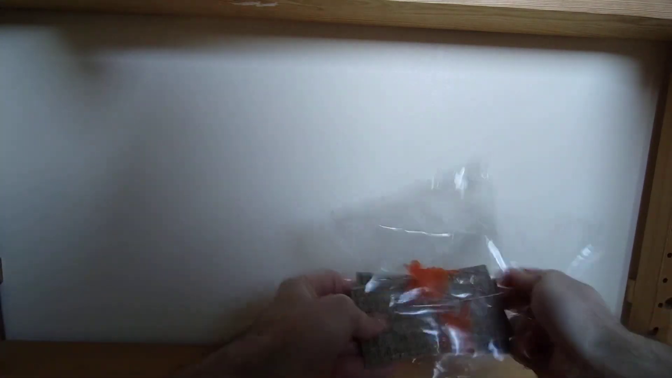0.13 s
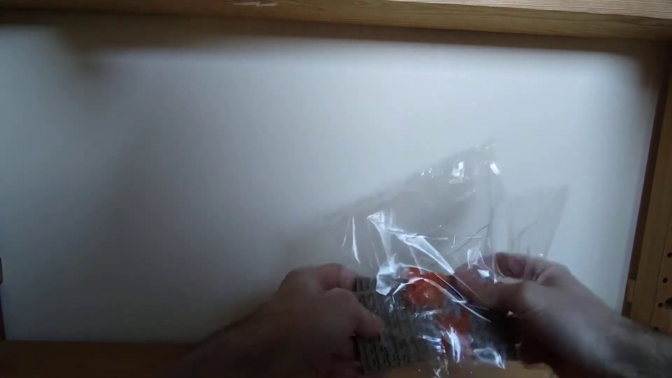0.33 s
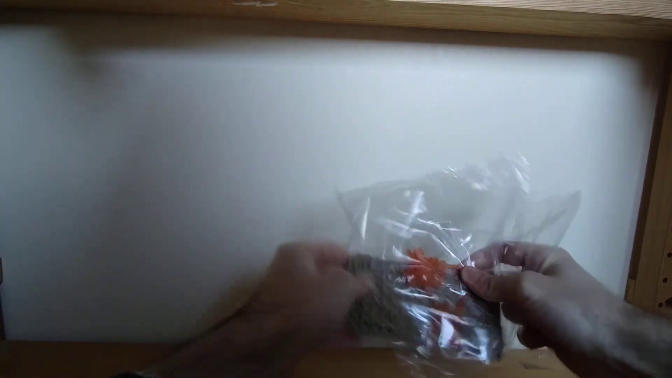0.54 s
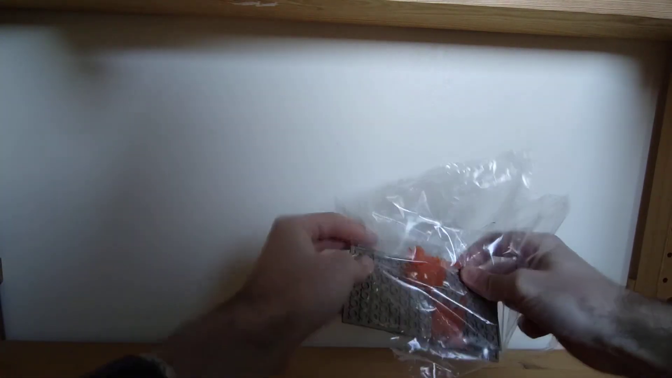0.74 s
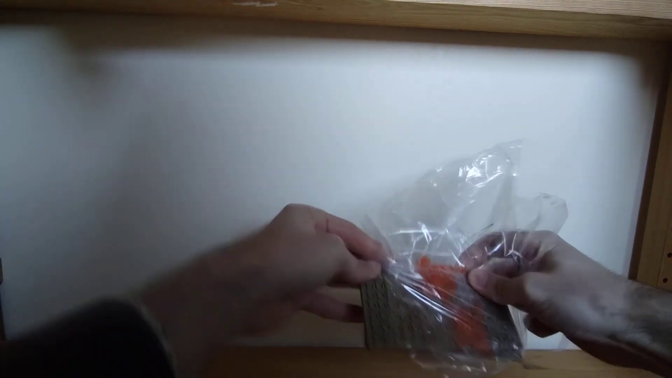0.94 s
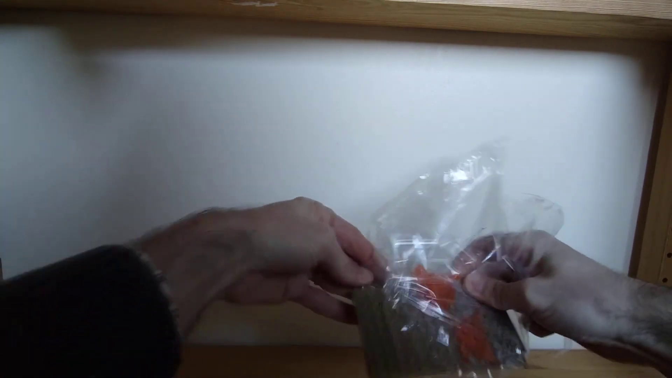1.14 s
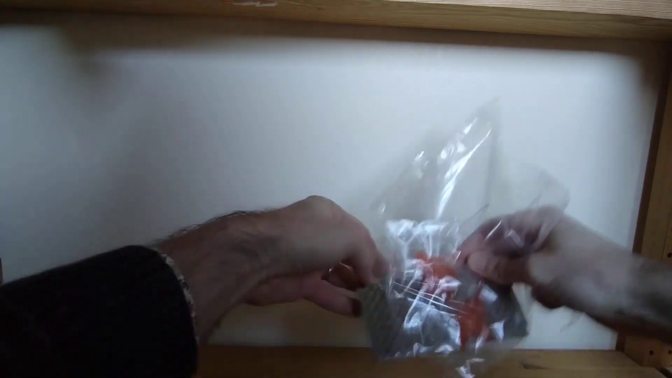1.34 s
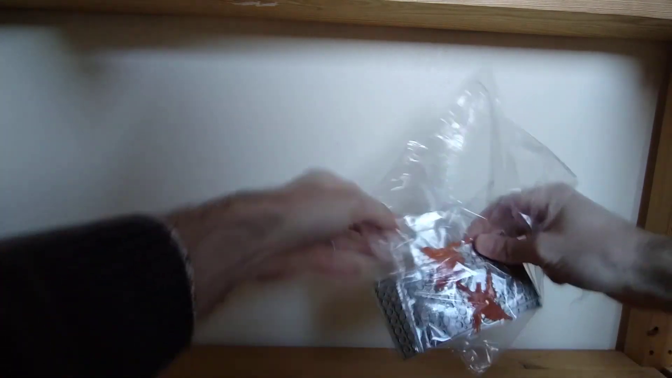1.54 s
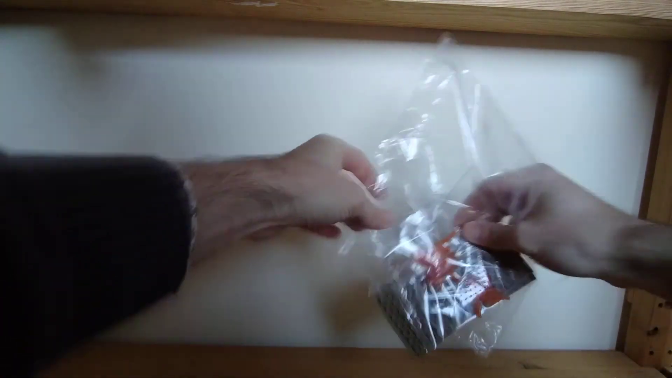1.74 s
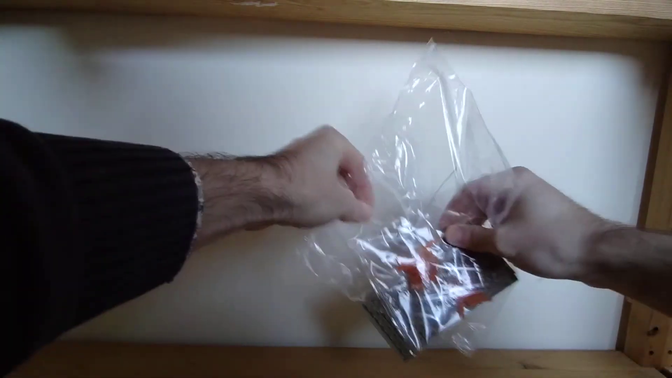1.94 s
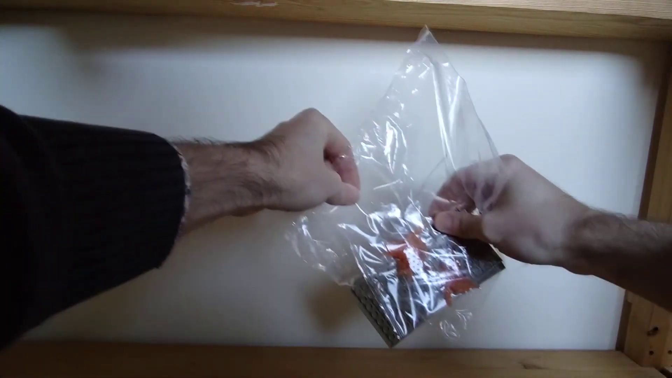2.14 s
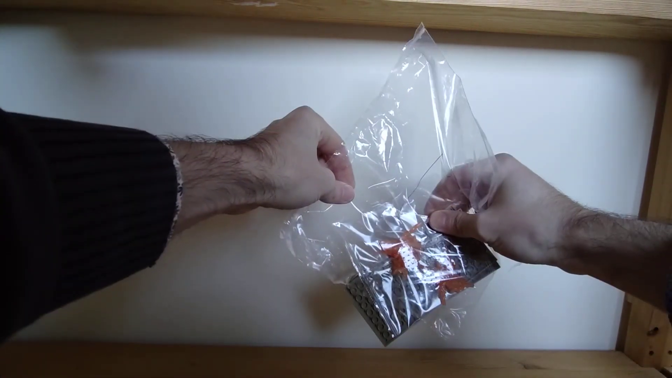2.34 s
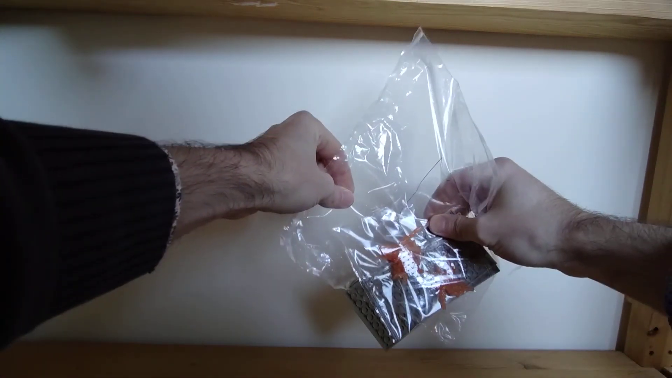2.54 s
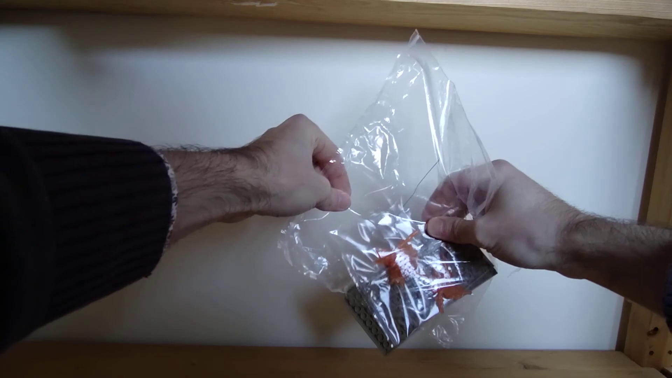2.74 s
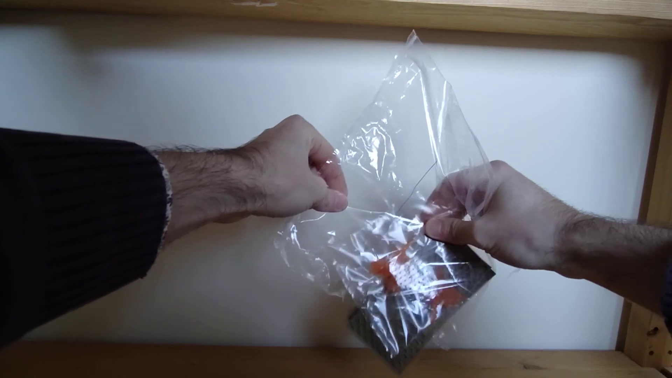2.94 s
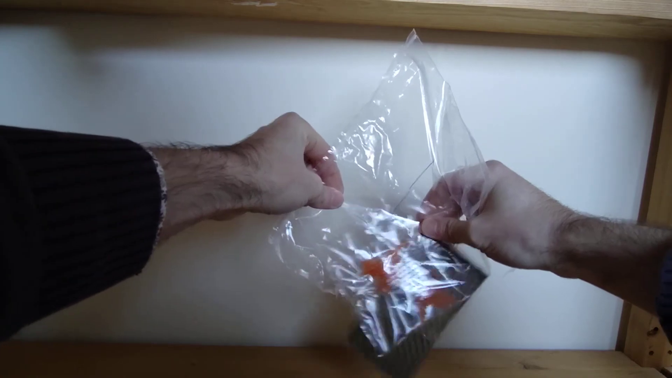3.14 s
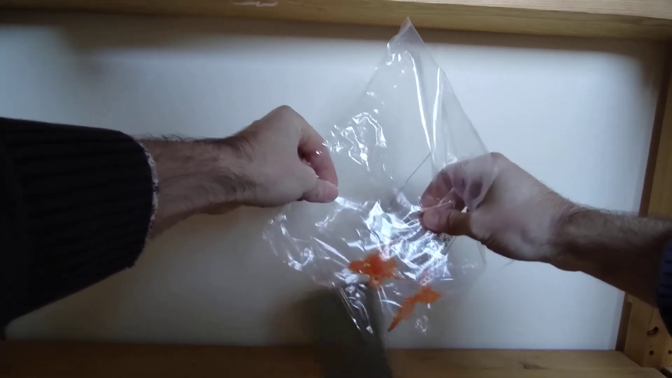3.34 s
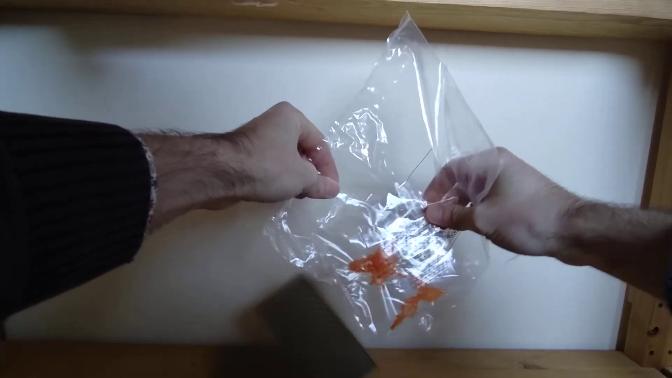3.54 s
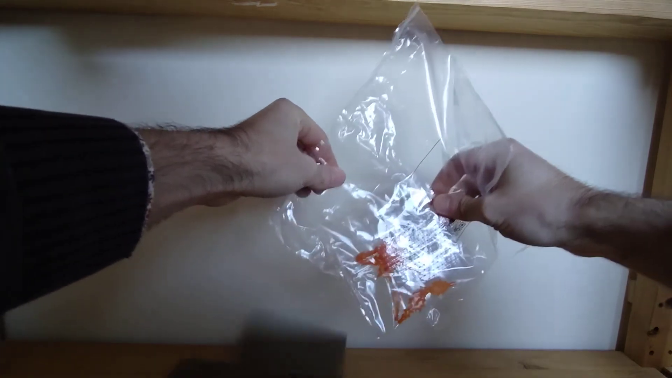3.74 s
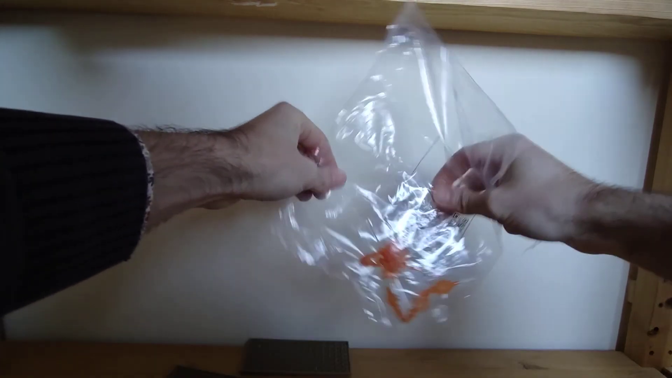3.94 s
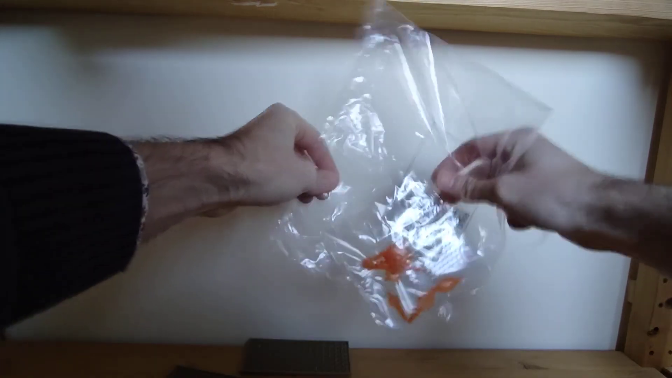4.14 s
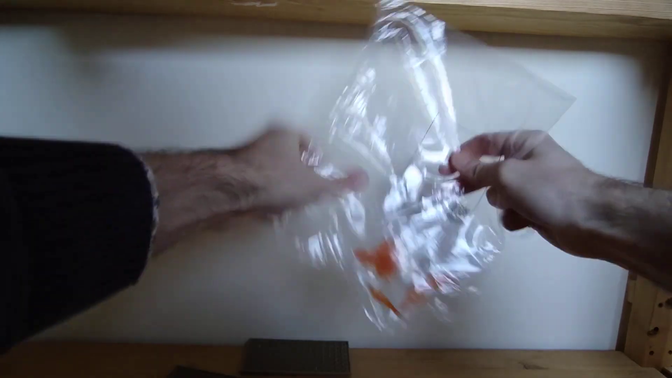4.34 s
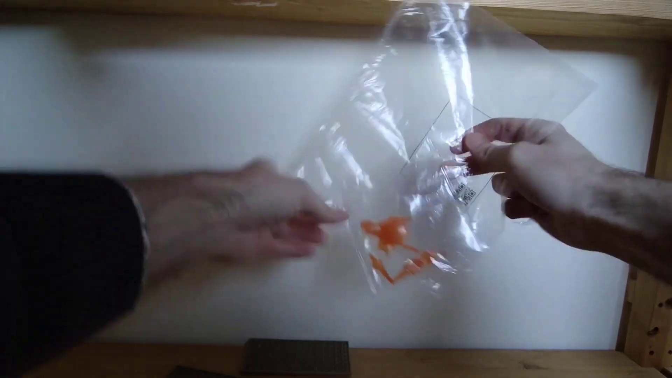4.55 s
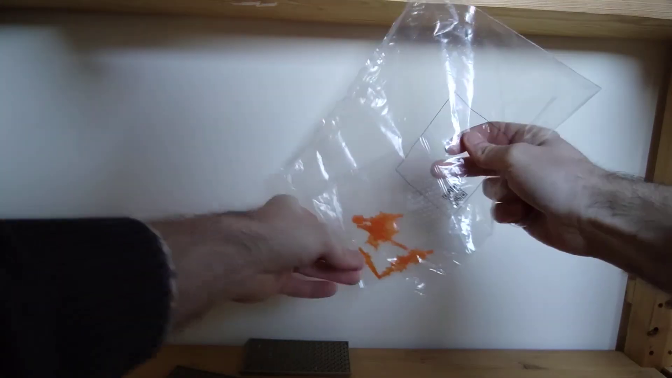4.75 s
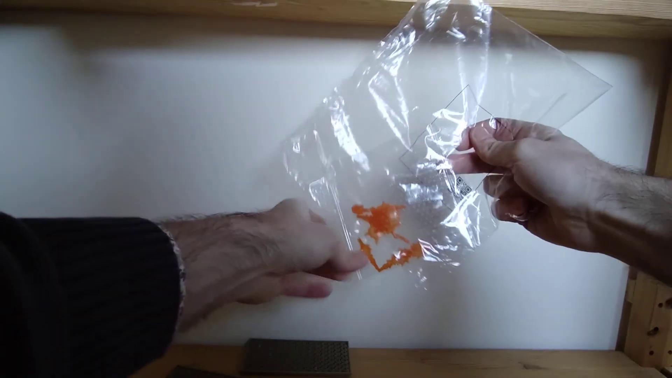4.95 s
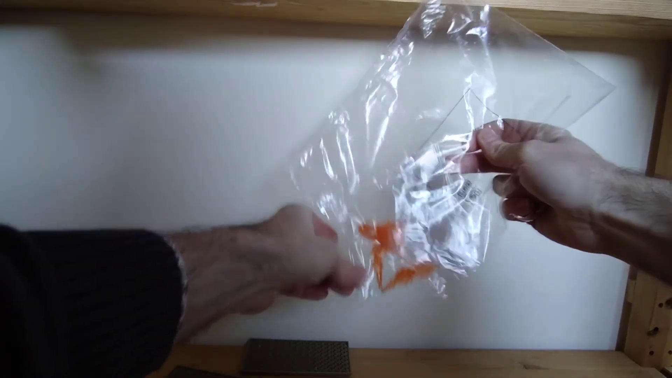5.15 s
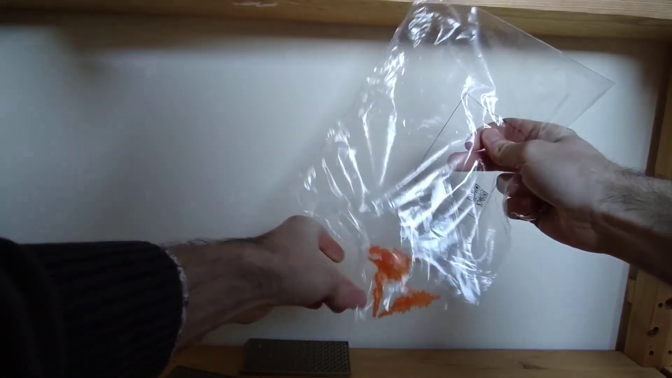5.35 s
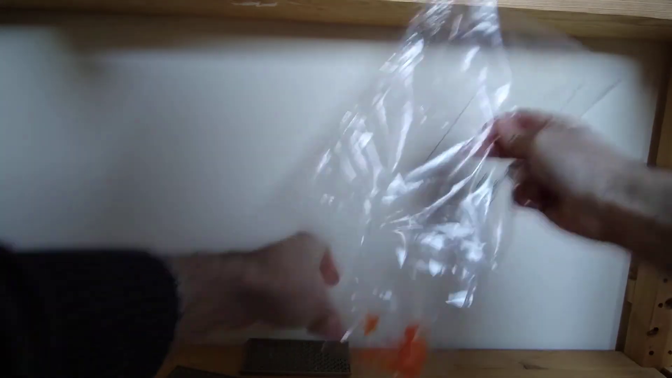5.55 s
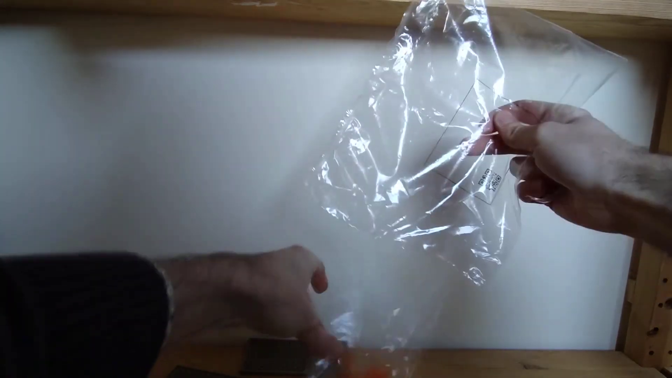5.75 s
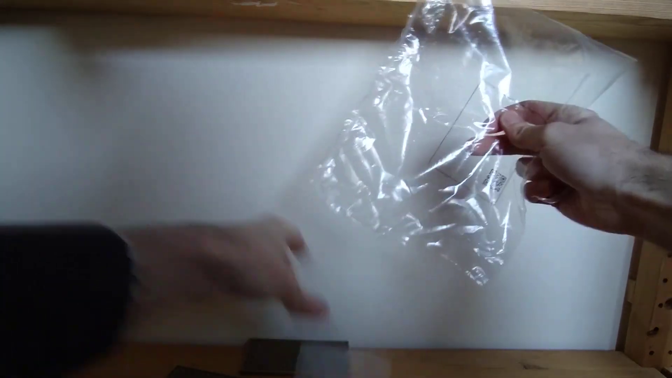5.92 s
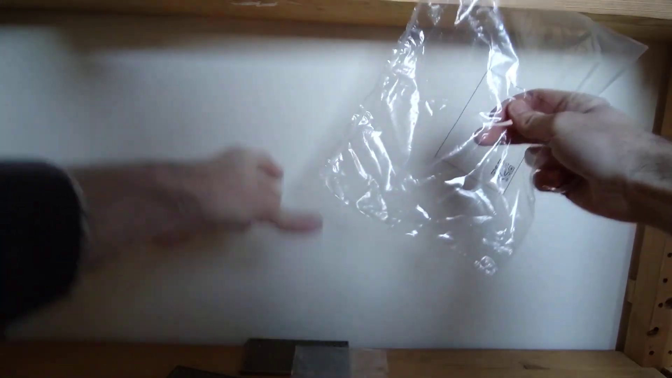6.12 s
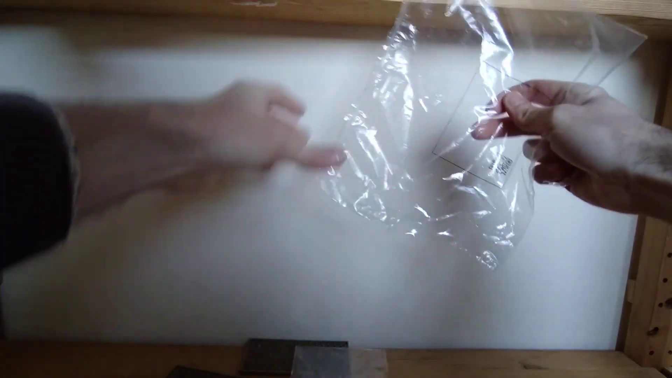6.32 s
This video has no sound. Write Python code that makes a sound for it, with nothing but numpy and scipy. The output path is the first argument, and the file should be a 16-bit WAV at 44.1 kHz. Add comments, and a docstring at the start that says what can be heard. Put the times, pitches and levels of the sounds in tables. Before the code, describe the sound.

Close stereo microphones inside a wooden shelf in a small room. Thin, stiff plastic film crackles and snaps as hands pull it, most densely early on, then nearly stills. A cardboard pad drops out and knocks and tumbles hollowly on the board, with one very sharp film snap. Irregular rustling resumes, and small bags land faintly near the end over low hiss.

```python
"""Inside a wooden shelf in a small room, a pair of microphones close to the hands.
The hands pull open a thin, stiff plastic bag: the film buckles in snaps, made of shaped noise bursts,
over a finer crackle of many tiny noise grains. A cardboard pad drops out and tumbles on the shelf board,
later the small bags follow: soft pushes and rattling noise drive the decaying modes of the board.
Sparse random echoes give the room; hiss lies beneath."""
import sys
import numpy as np
from scipy import signal
from scipy.fft import rfft, irfft
from scipy.io import wavfile
from scipy.ndimage import uniform_filter1d

SR = 44100
rng = np.random.default_rng(int(sys.argv[2]) if len(sys.argv) > 2 else 0)


def int16_out(signal):
    """Quantize to a 16-bit WAV file."""
    q = np.round(np.clip(np.atleast_2d(signal).T, -1, 1) * 32767)
    wavfile.write(sys.argv[1], SR, q.astype(np.int16))


N = 285768  # samples


def gain_of(db):
    """Amplitude factor of a level in dB."""
    return 10 ** (np.asarray(db) / 20)


def power_of(db):
    """Power factor of a level in dB."""
    return 10 ** (np.asarray(db) / 10)


def evened(x):
    """Bring a sound to an RMS of 1 over all its channels."""
    return x / np.sqrt(np.mean(x ** 2) + 1e-20)


def frequencies(size):
    """Frequencies in Hz of the spectrum of that many samples."""
    return np.fft.rfftfreq(size, 1 / SR)


def read_curve(points, hz):
    """Read a curve over frequency, straight on a logarithmic frequency axis."""
    f, value = np.transpose(points)
    return np.interp(np.log(hz + 1), np.log(f + 1), value)


def add(mix, s, sound):
    """Lay a stereo sound into the mix at s seconds, cut off at the end."""
    part = mix[:, round(s * SR):][:, :sound.shape[1]]
    part += sound[:, :part.shape[1]]


# likeness of the two microphones: (f/Hz, share in common 0-1)
LIKENESS = [(60, 1), (200, 0.97), (350, 1), (560, 0.42), (1400, 0.52), (3000, 0.037), (16000, 0.0081)]


def pair(a, b, gain=1):
    """Two spaced microphones: alike in the bass, nearly unrelated in the treble."""
    same = np.clip(read_curve(LIKENESS, frequencies(len(a))), 0, 1)
    left = rfft(a)
    right = same * left + np.sqrt(1 - same ** 2) * rfft(b)
    return irfft(gain * np.array([left, right]), len(a))


def burst(noise, colour, rise_s, length_s, lag_s=0, direct=0):
    """Coloured noise under a quick rise and a dying tail; a direct share reaches both microphones, lagged."""
    size = noise.shape[1]
    t = np.arange(size) / SR
    tail = np.exp(-(t / length_s) ** 1.8) + .15 * np.exp(-t / (3 * length_s))
    shape = (1 - np.exp(-t / rise_s)) * tail
    left, right = evened(pair(*noise, colour))
    lagged = irfft(rfft(left) * np.exp(-2j * np.pi * frequencies(size) * lag_s), size)
    right = direct * lagged + np.sqrt(1 - direct ** 2) * right
    return np.array([left, right]) * shape / shape.max() / 2


def swell(s, rise_s, hold_s, db, dying_db):
    """Power of a move: a steep rise, a hold, then a steady fall in dB per second."""
    t = np.arange(N) / SR - s
    falling_db = db - dying_db * np.maximum(t - rise_s - hold_s, 0)
    return power_of(falling_db) * np.clip(t / rise_s, 0, 1) ** 4


# colour of the background, relative: (f/Hz, level/dB per Hz)
HISS_COLOUR = [(15, -23), (25, -8), (109, 5), (587, -14), (2290, -19), (2770, -48), (3090, -77),
               (6090, -47), (10200, -33), (15000, -26), (16700, -53)]
HISS_RMS_DB = -58  # ahead of the microphone response


def hiss():
    """Microphone noise, apart in each channel, and the quiet of the house shared by both."""
    colour = gain_of(read_curve(HISS_COLOUR, frequencies(N)))
    own, shared = rng.standard_normal((2, N)), rng.standard_normal(N)
    return gain_of(HISS_RMS_DB) * evened(irfft(rfft(own + 0.69 * shared) * colour, N))


# how long the room rings: (f/Hz, t60/s)
ROOM_DECAY = [(100, 0.23), (400, 0.32), (1700, 0.25), (4600, 0.25), (12000, 0.22)]


def room(x):
    """Sparse taps of random sign, each band dying at its own speed; the small space holds little bass."""
    signs = rng.choice([-1., 1.], (2, SR))
    taps = signs * (rng.random((2, SR)) < .06)
    hz, t, z = signal.stft(pair(*taps), SR, nperseg=256)
    t60 = np.maximum(read_curve(ROOM_DECAY, hz), .05)[:, None]
    tail = signal.istft(z * gain_of(-60 * t / t60), SR, nperseg=256)[1]
    tail = signal.sosfilt(signal.butter(2, 300, "high", fs=SR, output="sos"), tail)
    tail = np.pad(tail, ((0, 0), (round(0.0035 * SR), 0)))  # the walls answer a little late
    return signal.fftconvolve(x, tail / np.linalg.norm(tail[0]), axes=1)[:, :N]


# modes of the shelf board and its hollow: (f/Hz, relative level/dB, t60/s)
BOARD_MODES = [(58.5, -16, 0.93), (117.6, -3, 0.13), (148.9, -2, 0.37), (192.4, -4.5, 0.21),
               (224, -6, 0.11), (262, -5, 0.087), (341, -2.5, 0.099), (456, -9, 0.041), (569, -5, 0.16),
               (708, -4.5, 0.047), (756, -7, 0.42), (913, 9.5, 0.025), (1225, 7.5, 0.029),
               (1282, 1.5, 0.071)]


def board_modes():
    """Decaying sines of the board as each microphone hears them: (microphone, mode, time)."""
    t = np.arange(SR // 2) / SR
    hz, db, t60 = np.transpose(BOARD_MODES)[:, :, None]
    facing = (-1) ** np.arange(len(BOARD_MODES))[:, None]  # neighbouring modes alternate in sign, so their sum adds no deep lump
    # the less alike the microphones at a pitch, the further out of step its mode reaches them
    lag = np.arccos(np.clip(read_curve(LIKENESS, hz), 0, 1)) * facing
    decay = facing * gain_of(db - 60 * t / t60)
    first_cycle = np.minimum(hz * t, 1)  # the phase difference opens over one cycle
    return np.array([decay * np.sin(2 * np.pi * hz * t + turn * first_cycle)
                     for turn in (lag / 2, -lag / 2)])


# pad and small bags landing on the board:
# (t/s, relative ring level/dB, hardness as low-pass f/Hz, relative slap level/dB)
BLOWS = [(3.4639, -11.5, 565, -14), (3.54, -16, 900, -35), (3.584, -16.5, 900, -21), (3.74, -17, 850, -2.5),
         (3.859, -21, 1550, -4), (3.898, -22, 1530, -5), (4.055, -28.5, 1140, -10), (4.09, -56, 520, -22),
         (4.26, -41.5, 199, -63), (5.656, -55, 900, -15.5), (5.927, -42, 730, -19.5),
         (6.117, -27, 194, -63), (6.151, -34, 204, -58), (6.22, -30.5, 199, -46), (6.302, -42.5, 202, -62)]


def blows(modes):
    """Each landing pushes the board modes, longer if softer, and slaps the air out."""
    out, hz = np.zeros((2, N)), frequencies(4096) + 1
    t = np.arange(2000)[None] / SR
    noise = rng.standard_normal((len(BLOWS), 2, 4096))
    for (s, ring_db, hard_hz, slap_db), z in zip(BLOWS, noise):
        u = 2 * np.pi * hard_hz * t
        push = u * np.exp(-u) * 2 * np.pi * hard_hz / SR
        spot = gain_of(1.5 * z[0, :len(BOARD_MODES)])  # each spot of the board favours other modes
        spot[0] *= min(hard_hz / 450, 1) ** 2  # a soft landing also damps the deepest mode
        add(out, s, -gain_of(ring_db) * signal.oaconvolve(spot @ modes, push, axes=1))
        slap_colour = 1 / (1 + (hz / (3 * hard_hz)) ** 2.7) / (1 + (400 / hz) ** 2)
        add(out, s, gain_of(slap_db) * burst(z, slap_colour, rise_s=0.0042, length_s=0.0031))
    return out


# pad and small bags rocking and scraping on the board:
# (start t/s, hold t/s, level/dB, fall/dB per s)
ROCKING = [(3.465, 0.061, -23.5, 132), (3.76, 0.024, -22.5, 150), (3.856, 0.13, -29, 92.5),
           (4.032, 0.075, -30, 153), (5.638, 0.013, -36, 200), (6.128, 0.055, -50, 121)]
ROCK_RISE_S = 0.016
GRIT_DB, GRIT_LOW_HZ, GRIT_HIGH_HZ = -8.5, 900, 2600  # grit of the scraping, against the ringing


def rocking(modes):
    """Dull noise of the contact drives the board modes; a band of the same noise is the grit."""
    contact = signal.lfilter([1], [1, -.93], pair(*rng.standard_normal((2, N))))
    band = signal.butter(1, [GRIT_LOW_HZ, GRIT_HIGH_HZ], "band", fs=SR, output="sos")
    grit = evened(signal.sosfilt(band, contact))
    ringing = evened(signal.oaconvolve(contact, modes.sum(1), axes=1)[:, :N])
    power = sum(swell(s, ROCK_RISE_S, *shape) for s, *shape in ROCKING)
    return np.sqrt(power) * (ringing + gain_of(GRIT_DB) * grit)


def board():
    """Blows and rocking share the modes of the one shelf board."""
    modes = board_modes()
    return blows(modes) + rocking(modes)


# moves of the hands, each a shower of crackle:
# (start t/s, hold t/s, crackle level/dB, fall/dB per s, treble relative to the crackle/dB)
MOVES = [(0, 0.078, -42, 75, -8.5), (0.309, .06, -31, 52.5, -6.5), (0.521, 0.53, -35.5, 66, -7.5),
         (1.3, 0.074, -34, 45, -15), (1.843, 0.019, -33, 89, -12), (2.955, 0.067, -52.5, 54, -16),
         (3.317, 0.081, -35.5, 68, -11.5), (3.507, 0.038, -40.5, 51, -11.5), (3.858, 0.046, -26, 73.5, -15),
         (3.944, 0.085, -22.5, 164, -27), (4.392, 0.03, -40.5, 133, -13), (4.56, .12, -49, 90, -11),
         (4.984, 0.023, -41, 140, -10.5), (5.205, 0.056, -41.5, 61, -16), (5.311, 0.014, -36.5, 47, -12),
         (5.645, 0.037, -20, 281, -8.5), (5.754, 0.06, -41.5, 106, -15), (5.92, .05, -49.5, 89, 0.5),
         (6.073, .04, -45.5, 110, -12)]
MOVE_RISE_S = 0.021
REST_DB, REST_BRIGHT_DB = -66.5, -10  # the bag at rest still ticks faintly


def hand_powers():
    """Power of the hands' moves over time: of the crackle below the treble, and of its treble."""
    powers = [swell(s, MOVE_RISE_S, *shape) for s, *shape, _ in MOVES]
    power = sum(powers) + power_of(REST_DB)
    treble = sum(p * power_of(move[-1]) for p, move in zip(powers, MOVES))
    return power, treble + power_of(REST_DB + REST_BRIGHT_DB)


# colour of the crackling film, relative: (f/Hz, level/dB per Hz)
FILM_COLOUR = [(35, -45), (60, -10.5), (140, -3), (173, -6), (662, -5.5), (900, -2.5), (1060, -7.5),
               (1960, 2), (6350, -5.5), (12300, -39), (15200, -28), (16700, -50)]


def crackle(per_s=600, spread_db=3.5, count=24):
    """A shower of tiny creases of many sizes; a hard slide packs them into a hiss."""
    power, treble = hand_powers()
    level_db = 10 * np.log10(power)
    rate = per_s * (1 + 12 / (1 + np.exp(-(level_db + 29) / 1.5)))  # grains per second
    size = gain_of(spread_db * np.minimum(rng.exponential(1, N), 5))
    size = size * (rng.random(N) < rate / SR) / np.sqrt(rate)
    kind, out = rng.integers(0, count, N), np.zeros((2, N))
    grain_hz = frequencies(512) + 1
    for k, ring_hz in enumerate(np.geomspace(400, 14000, count)):
        hump = .35 + np.exp(-(np.log2(grain_hz / ring_hz) / .6) ** 2)
        grain = burst(rng.standard_normal((2, 512)), hump, rise_s=0.0004, length_s=0.0025)
        out += signal.oaconvolve((size * (kind == k))[None], grain, axes=1)[:, :N]
    # flatten the shower's spectrum, then give it the colour of the film
    spectrum, hz = rfft(out), frequencies(N)
    flat = spectrum / np.sqrt(uniform_filter1d((abs(spectrum) ** 2).mean(0), size=2000))
    shower = flat * gain_of(read_curve(FILM_COLOUR, hz))
    high = 1 / (1 + (9000 / (hz + 1)) ** 8)
    dull = evened(irfft(shower * (1 - high), N))
    bright = evened(irfft(shower * high, N))
    return np.sqrt(power) * dull + np.sqrt(treble) * bright


def crease(noise, ring_hz, fizz_db, body_db, length_s, lag_s):
    """One crease flips: a broad crack with a hump set by the size of the facet; a long one runs in jerks."""
    hz = frequencies(noise.shape[1]) + 1
    hump = np.exp(-(np.log2(hz / ring_hz) / 0.31) ** 2)
    fizz = gain_of(fizz_db - 7.5) / (1 + (10500 / hz) ** 8)
    body = gain_of(body_db + 6.5) / (1 + (hz / 1300) ** 4) / (1 + (250 / hz) ** 3)
    broad = gain_of(-3.5) / (1 + (hz / 8500) ** 6) / (1 + (1200 / hz) ** 3)
    jerks = gain_of(2 * evened(uniform_filter1d(noise[0] * noise[1], size=50)))
    colour = hump + broad + fizz + body
    sound = jerks * burst(noise, colour, .25 * length_s, length_s, lag_s, direct=.6)
    return sound / abs(sound).max(1).mean()


SMALL_PER_S = 35
SMALL_DB, SMALL_SPREAD_DB = 6, 3.5  # least level over the crackle, and scale of the chance extra
SMALL_TOP_DB = -25  # crackle level above which a hard slide makes no bigger snaps
SMALL_FIZZ_DB, SMALL_MS = -23, 2.6  # averages
LOW_RING_HZ, HIGH_RING_HZ = 1300, 8000


def small_snaps():
    """Rows for the many lesser snaps, at chance moments, as strong as the hands move."""
    at, size, ring, fizz, length = rng.random((round(SMALL_PER_S * N / SR), 5)).T
    power, _ = hand_powers()
    crackle_db = 10 * np.log10(power[(at * N).astype(int)])
    extra_db = SMALL_DB - SMALL_SPREAD_DB * np.log(1 - .95 * size)
    db = np.minimum(crackle_db, SMALL_TOP_DB) + extra_db
    hz = LOW_RING_HZ * (HIGH_RING_HZ / LOW_RING_HZ) ** ring
    return list(zip(at * N / SR, db, hz, 2 * SMALL_FIZZ_DB * fizz, SMALL_MS * (.5 + length)))


# the clearest buckling creases of the film:
# (t/s, peak level/dB, ringing f/Hz, relative fizz level above 10 kHz/dB, length t/ms)
SNAPS = [(0.0294, -27, 6200, -10, 5.7), (.06, -27.5, 2930, -9, 2.3), (0.1364, -17.5, 2260, 3, 3.9),
         (0.2767, -18.5, 2640, -26, 6), (0.2946, -22, 5450, -6, 11.5), (.353, -15, 8300, 1, 5.7),
         (0.406, -28, 2670, -18, 6.3), (0.43, -14.5, 6030, 15, 3), (0.4557, -25, 2060, -17.5, 7.3),
         (0.485, -20, 5670, 10, 2.7), (0.5437, -23, 4370, -19, 4.8), (.578, -15, 3640, 3, 9.2),
         (0.5938, -16.5, 2240, -22, 6.9), (0.6108, -30, 2260, -31, 3.8), (.7, -21.5, 2120, -19.5, 8.5),
         (0.758, -14, 1890, -18, 3.3), (0.8509, -10.5, 6000, -4, 3.7), (0.896, -15.5, 3620, -3, 2.2),
         (.903, -19, 2200, -24, 5), (0.9333, -15, 4300, -24, 2.4), (.9564, -10.5, 1930, -5, 2.4),
         (0.9934, -17, 4650, -22, 1.3), (1.0041, -11.5, 4820, -4, 1.3), (1.0342, -12, 4640, 3, 5.3),
         (1.0829, -15, 2050, -33, 4.4), (1.1596, -21.5, 9100, -5, 5.6), (1.175, -15, 5060, -27, 4.1),
         (1.198, -4, 5630, -21.5, 1.03), (1.2135, -19, 1600, -3, 1.9), (1.2673, -14, 1600, -27, 1.9),
         (1.3093, -8, 6200, -14, 1.3), (1.3133, -8, 2360, -8, 5.7), (1.331, -7.5, 4430, 10, 4.7),
         (1.388, -12.5, 9700, -20, 0.88), (1.4177, -15.5, 5900, -20, 3.5), (1.4232, -11, 7040, -3, 3.2),
         (1.4577, -18, 7060, -5, 12), (1.506, -19, 5500, 0, 11), (1.532, -16, 1870, -7, 7.3),
         (1.5426, -18.5, 8300, -21, 5.9), (1.615, -18, 6100, -4, 3.4), (1.6437, -24, 4300, -1, 2.8),
         (1.6685, -22, 2450, -33, 2.8), (1.7342, -20.5, 1240, -27, 2.6), (1.7876, -17.5, 6400, -4, 2.3),
         (1.8076, -17, 1850, -12, 3.9), (1.8613, -12, 6000, 0, 2.5), (1.866, -20.5, 5430, -1, 3.5),
         (1.918, -12, 3840, -1, 3.9), (1.9299, -16, 2820, -35, 1.4), (2.0001, -7, 8000, -2, 1.35),
         (2.1236, -27, 2000, -28, 5.3), (2.148, -22, 5040, -5, 6.2), (2.1694, -13.5, 2570, -5, 2.1),
         (2.2165, -32.5, 2450, -18, 3.1), (2.4096, -45, 1640, -25, 2.4), (2.466, -18, 6800, -6, 4.1),
         (2.566, -38, 1880, -19, 4.1), (2.648, -39, 3580, -39, 3), (2.784, -41.5, 2620, -29, 4.6),
         (2.97, -32, 4050, 1, 4.4), (2.992, -30, 2600, -26, 3.4), (3.0282, -30.5, 1980, -27, 3.2),
         (3.0467, -32.5, 3900, -26, 2.7), (3.091, -31.5, 1900, -20, 3.5), (3.1338, -25.5, 1840, -16, 3.8),
         (3.2707, -23, 1910, -13, 3.2), (3.3244, -19, 5900, -1, 2.1), (3.3393, -27, 2460, -15, 11),
         (3.3665, -17.5, 2580, -10, 7.2), (3.382, -14, 6040, 11, 2.6), (3.4374, -22.5, 1970, -1, 3.7),
         (3.6133, -19.5, 4000, -4, 4.9), (3.6825, -22.5, 7200, -5, 3.8), (3.957, -12, 2260, -20, 5.3),
         (3.9663, 0, 2600, -26, 6.2), (4.3959, -20.5, 3160, -4, 2.5), (4.4437, -19, 1730, -22, 2.7),
         (4.4706, -22.5, 5330, 7, 4), (4.557, -20, 5740, -4, 4.6), (4.5835, -30, 1910, -27, 2.2),
         (4.6402, -23, 7740, -2, 2.2), (4.6488, -23, 4680, -8, 3.4), (4.6707, -23.5, 4930, 1, 4.6),
         (4.7118, -15.5, 7040, 1.5, 2.6), (4.7488, -32, 1980, -7, 2.3), (4.813, -32, 2730, -26, 3),
         (4.8466, -28.5, 5650, -5, 4.3), (4.9494, -31, 3930, -2, 4.4), (4.9644, -12.5, 3800, -1.5, 1.5),
         (5.0064, -24, 6270, -14, 3.5), (5.0645, -26.5, 3870, -21, 14.6), (5.1794, -17.5, 1790, -14, 7.7),
         (5.1869, -17, 1760, -4, 12.7), (5.2518, -27, 5730, 6, 2.4), (5.2937, -21.5, 2000, -5, 6.3),
         (5.309, -9.5, 6800, -3, 1.35), (5.3455, -15, 6100, 2, 8.5), (5.3635, -14.5, 1460, -8, 2.1),
         (5.394, -4, 5800, 6, 3.7), (5.4274, -10.5, 2260, -29.5, 3.1), (5.492, -50, 1670, -16, 2.1),
         (5.5406, -21, 1037, 1.5, 11), (5.5708, -37, 3530, -15, 11), (5.6286, -18.5, 6150, 0, 9.8),
         (5.725, -12.5, 2040, 3, 4), (5.753, -12, 6000, -3, 4), (5.8231, -22, 5680, -2, 6.6),
         (5.925, -10.5, 5550, -1, 6.3), (6.0726, -18, 5800, 8, 8.7), (6.1224, -15, 2370, -4, 7.8),
         (6.2178, -22.5, 3440, -13, 1.9), (6.4113, -39, 1970, -34.5, 1.1)]
# body of the snaps under 1.2 kHz, relative; film pulled taut has little: (t/s, level/dB)
BODY = [(0, -6.5), (.5, -7), (.7, -26), (1.45, -20.5), (1.75, -12.5), (2.2, -4.5), (3, -8), (3.4, -13),
        (4, -30), (4.5, -7.5), (5.5, -7), (6.48, -7.5)]


def snaps():
    """The single snaps; slack film adds body, a crease that runs along the film lasts longer."""
    rows = small_snaps() + SNAPS
    out, noise = np.zeros((2, N)), rng.standard_normal((len(rows), 2, 2049))
    for (s, db, hz, fizz_db, length_ms), z in zip(rows, noise):
        lag_s = .0005 * z[1, 0]  # chance arrival difference between the microphones
        body_db = np.interp(s, *np.transpose(BODY))
        sound = crease(z[:, 1:], hz, fizz_db, body_db, length_ms / 1000, lag_s)
        side_db = 1.5 * z[0, 0] * np.array([[1], [-1]])  # each crease faces one microphone a little more
        add(out, s, gain_of(db + side_db) * sound)
    return out


HOLLOW_HZ, HOLLOW_Q, HOLLOW_DB = 852, 14, -5.5


def hollow(near):
    """The air inside the shelf rings along with the snaps: one resonance."""
    return gain_of(HOLLOW_DB) * signal.lfilter(*signal.iirpeak(HOLLOW_HZ, HOLLOW_Q, SR), near)


def scene():
    """Snaps, crackle and board close up, the room's answer to them, and the hiss."""
    near, fine, wood = snaps(), crackle(), board()
    near = near + hollow(near)
    to_room = gain_of(-6.5) * near + gain_of(-7) * fine + gain_of(-0.5) * wood
    return near + fine + wood + room(to_room) + hiss()


EDGE_HZ = 16650  # upper band limit


def record(dry):
    """The microphones lose the deepest bass, round off the highest peaks, then the band limit."""
    thin = signal.sosfilt(signal.butter(4, 48, "high", fs=SR, output="sos"), dry)
    rounded = 0.68 * np.tanh(thin / 0.79)
    band_limit = signal.firwin(511, EDGE_HZ, window=("kaiser", 9), fs=SR)[None]
    return signal.oaconvolve(rounded, band_limit, "same")


dry = scene()
out = record(dry)
int16_out(out)
```